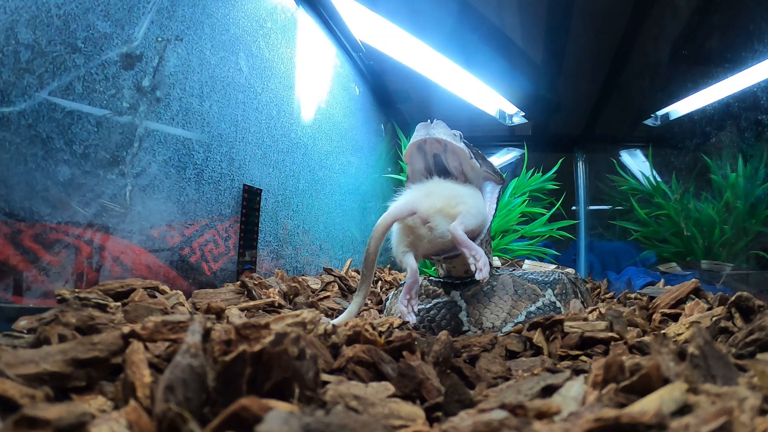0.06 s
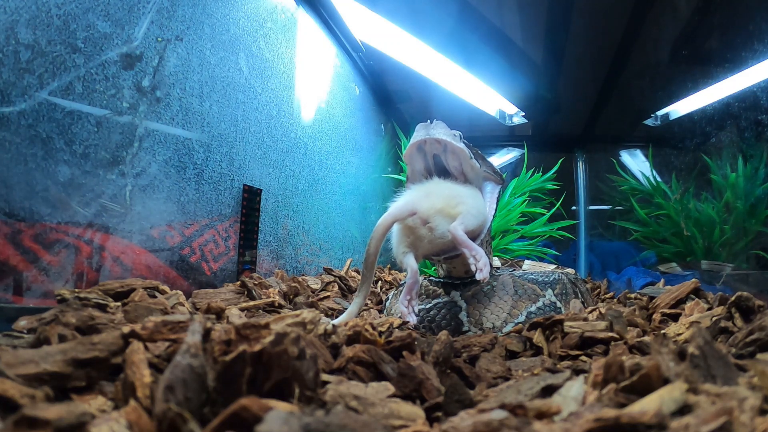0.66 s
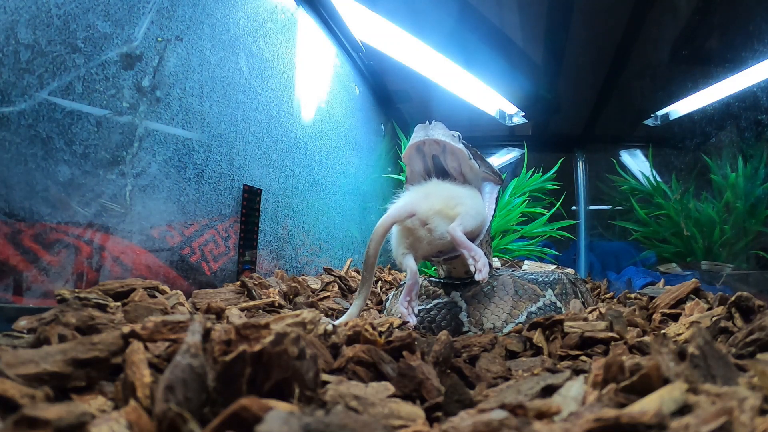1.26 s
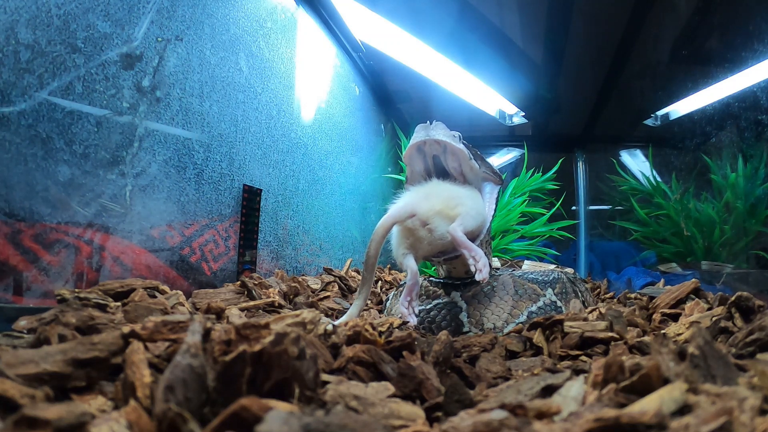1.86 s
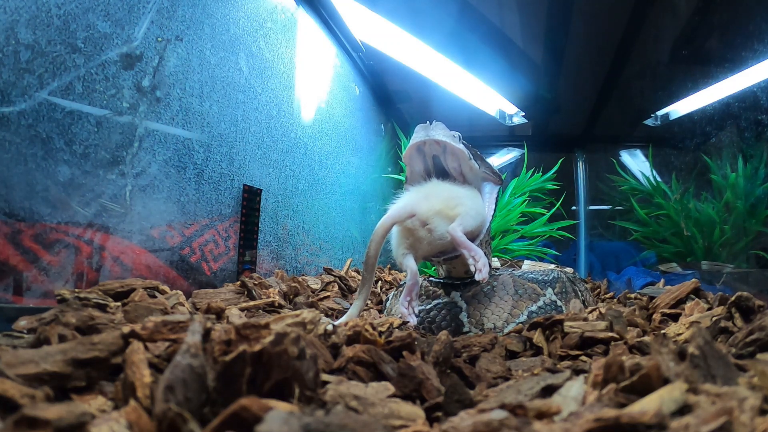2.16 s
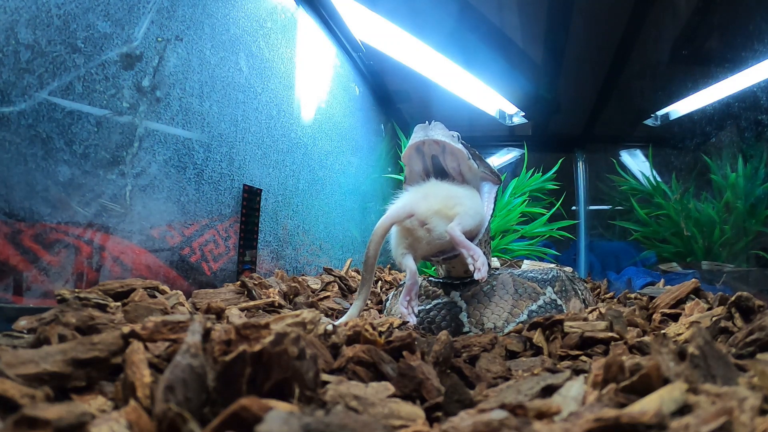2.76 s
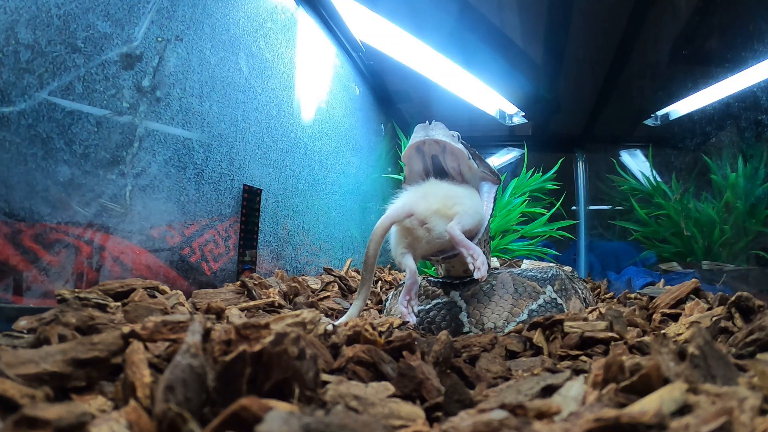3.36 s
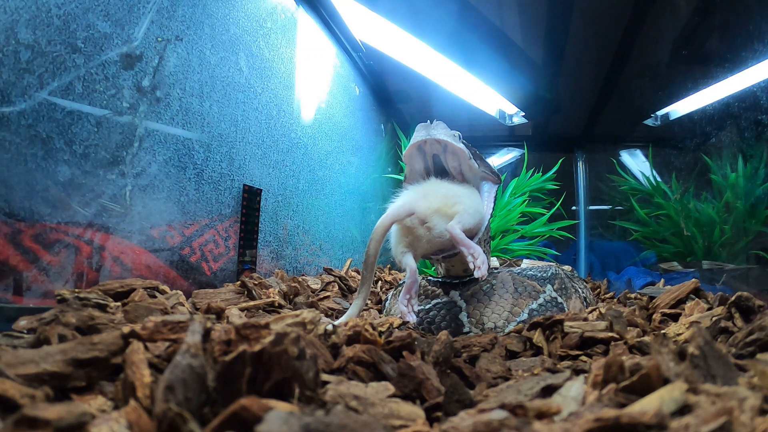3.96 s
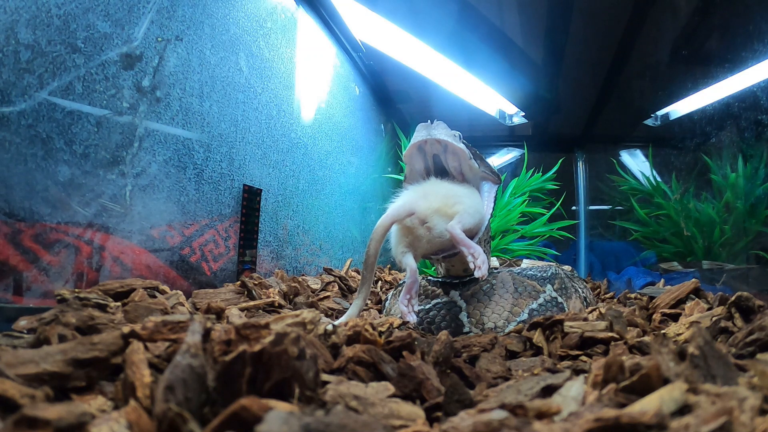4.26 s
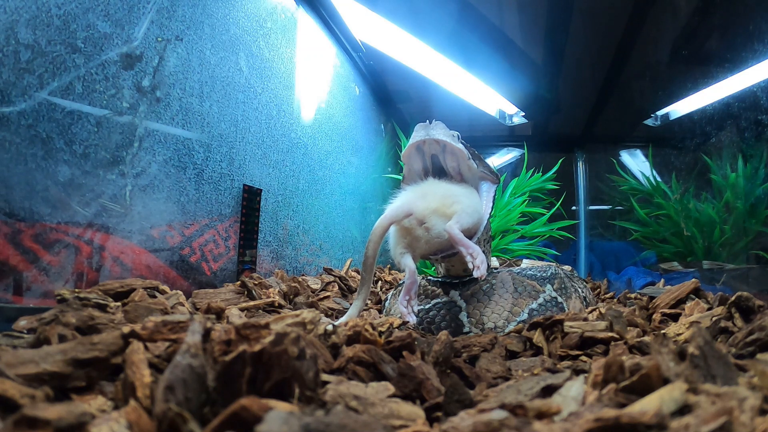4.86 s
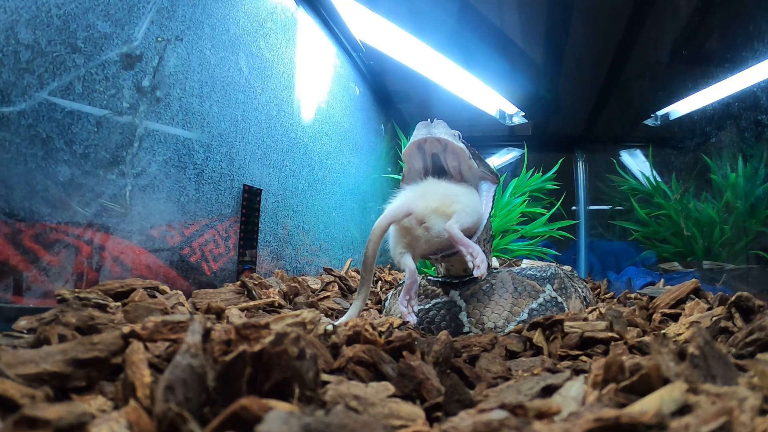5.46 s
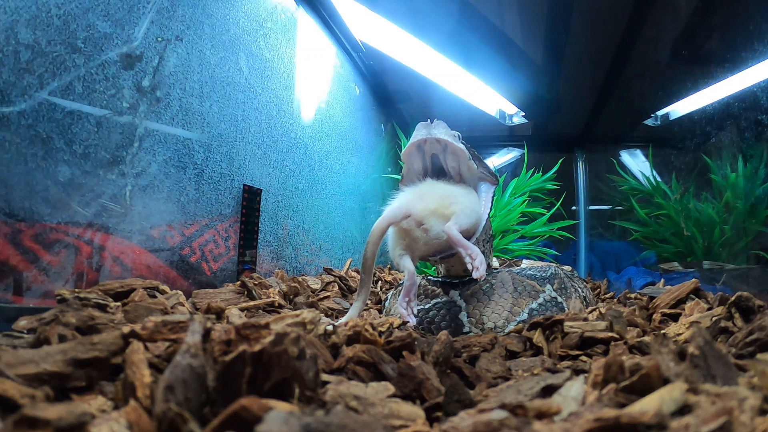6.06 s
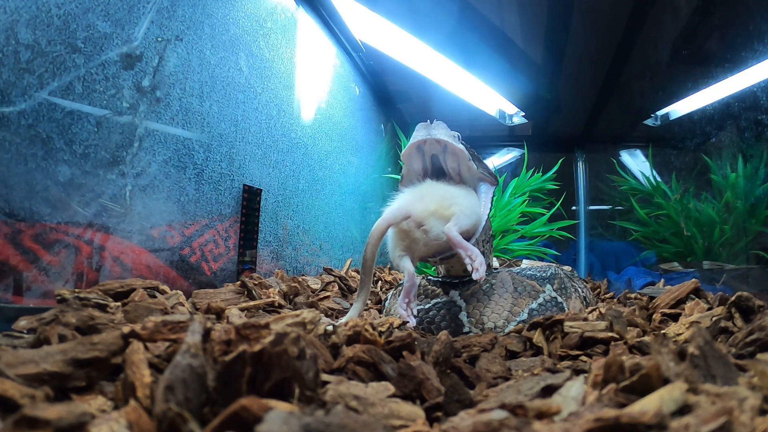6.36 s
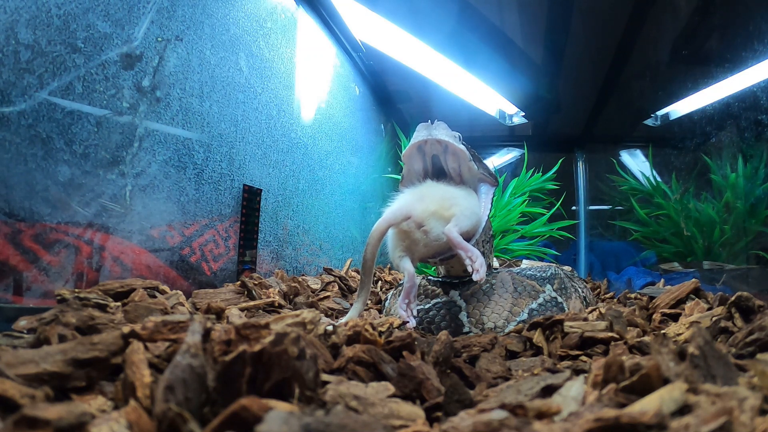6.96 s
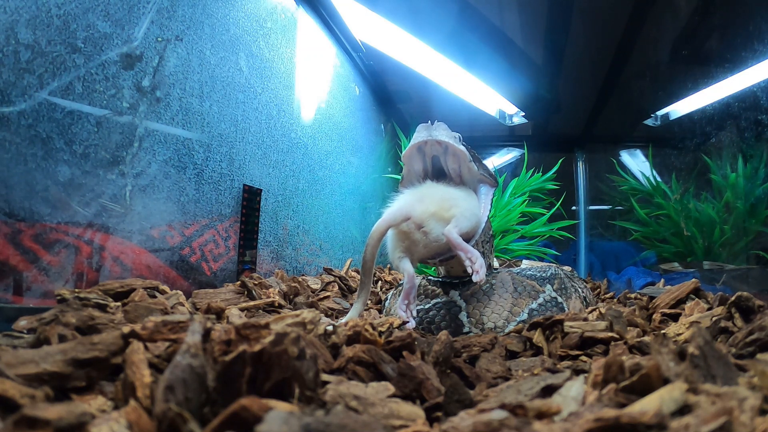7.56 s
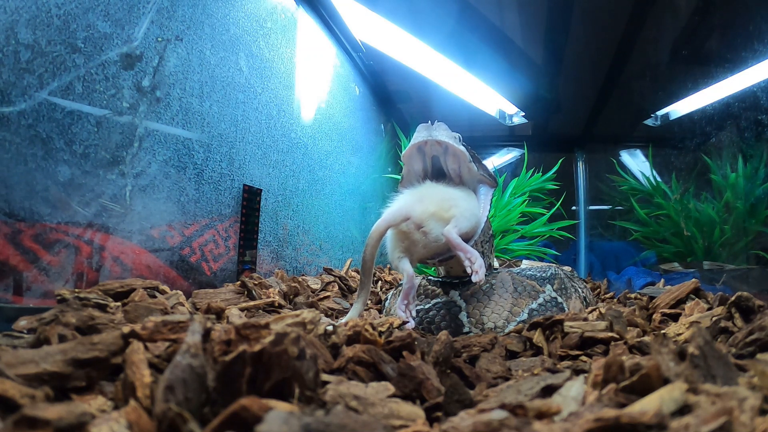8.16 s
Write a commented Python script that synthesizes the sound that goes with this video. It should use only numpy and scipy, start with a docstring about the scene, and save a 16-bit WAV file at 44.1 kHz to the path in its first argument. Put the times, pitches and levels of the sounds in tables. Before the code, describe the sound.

A steady low electrical hum and fan hiss in a terrarium, with one light knock and a few soft scuffs on bark.

```python
"""Inside a glass terrarium in a quiet room: a mains motor hums and its fan hisses steadily.
The tank booms at the hum's strongest line and rings in the hiss with many narrow resonances.
A light knock rings a hollow body once. Soft scuffs and low bumps on the bark bedding are
probably a snake shifting with its prey."""
import sys
import numpy as np
from scipy import signal
from scipy.fft import rfft, irfft
from scipy.io import wavfile
from scipy.ndimage import uniform_filter1d

SR = 44100
rng = np.random.default_rng(int(sys.argv[2]) if len(sys.argv) > 2 else 0)


def wav_record(signal):
    """Record a signal, one row per channel, as 16-bit PCM in the file named by sys.argv[1]."""
    frames = np.transpose(np.atleast_2d(signal))
    bounded = np.clip(frames, -1, 1)
    # unit amplitude maps onto the largest positive 16-bit level
    quanta = np.round(bounded * 32767).astype(np.int16)
    wavfile.write(sys.argv[1], SR, quanta)


N = 362502

# Motor lines. Each row: multiple of the shaft rate, level in dB.
MOTOR_LINES = [(4, -67), (5, -67), (6, -38.5), (9, -64.5), (10, -62.5), (14, -77.5), (16, -75.5)]
# Uneven waver of the hum. Each row: time in seconds, level in dB before centring and scaling.
HUM_WAVER = [(0.1, -39.5), (1.5, -39), (1.59, -44.5), (1.68, -37.5), (1.88, -43.5), (1.93, -39.5),
             (5.5, -39.5), (5.6, -41), (5.82, -37), (5.91, -41.5), (6.52, -40.5), (6.76, -35.5),
             (6.83, -39.5), (7.19, -38.5), (7.29, -40.5), (7.56, -37.5), (7.79, -41), (8.1, -37.5)]
# Fan noise spectra. Each row: frequency in Hz, relative density in dB.
RUMBLE_SPECTRUM = [(10, -35.5), (24, -15.5), (50, -13), (95, -18), (140, -14), (163, -2), (182, 3),
                   (205, -4), (225, -12.5), (285, -14), (322, -7.5), (350, -18.5), (385, -21.5), (455, -24),
                   (505, -22.5), (545, -30.5), (700, -32)]
HISS_SPECTRUM = [(850, -30.5), (1200, -29.0), (1550, -26.0), (1800, -16.5), (2050, -15.5), (2300, -4.5),
                 (2520, -9.0), (2700, -4.5), (3150, -8.0), (3450, -18.0), (3750, -21.0), (4400, -19.5)]
FIZZ_SPECTRUM = [(4400, -1), (5600, -6), (6500, -5.5), (7050, -0.5), (7500, -7.5), (8200, -7.5), (8750, -6),
                 (9500, -13), (10800, -20.5), (12100, -22), (13500, -24.5), (15000, -53)]
WHOOSH_SPECTRUM = [(600, -35), (880, -21), (950, -11), (1000, -8), (1130, -5), (1330, -6), (1420, -11),
                   (1800, -12.5), (2500, -57)]
# Slow drift of the whoosh. Each row: time in seconds, gain in dB.
WHOOSH_DRIFT = [(0.27, -5), (0.44, -1), (0.54, -2), (0.69, 2.5), (1.01, -4), (1.3, 2), (1.62, -7),
                (1.93, 0), (2.23, 0.5), (2.87, -3), (3.07, 1.5), (3.17, -4), (3.39, 3.5), (3.72, -5),
                (3.87, 4), (4.27, -1.5), (4.53, 1.5), (4.64, -5), (4.85, 0.5), (4.96, -4), (5.3, 0.5),
                (5.51, -3.5), (5.73, -2.5), (6.3, -2), (6.75, 2.5), (6.94, -4), (7.03, 0), (7.14, -0.5)]
# Tank resonances. Each row: frequency in Hz, width in Hz, lift in dB.
TANK_RESONANCES = [(980, 48, 6.0), (1030, 22, 9.0), (1111, 48, 5.5), (1196, 48, 2.5), (1359, 42, 5.0),
                   (1643, 48, 4.5), (1891, 11, 8.0), (1921, 23, 7.0), (1991, 32, 12.0), (2073, 48, 11.0),
                   (2176, 18, 7.5), (2239, 21, 8.0), (2282, 40, 6.0), (2321, 20, 9.0), (2410, 38, 10.5),
                   (2459, 33, 7.0), (2553, 7, 8.0), (2636, 48, 6.5), (2696, 8, 5.5), (2771, 8, 5.5),
                   (2843, 48, 5.5), (2897, 17, 4.0), (3069, 37, 9.5), (3126, 14, 7.5), (3264, 48, 6.5),
                   (3325, 26, 4.5), (3422, 48, 5.5), (3469, 29, 13.5), (3519, 36, 12.0), (3602, 29, 9.5),
                   (3699, 11, 4.5), (3786, 48, 5.0)]
# Left-right likeness of the air. Each row: frequency in Hz, coherence from 0 to 1.
STEREO_COHERENCE = [(50, 0.6), (180, 0.99), (350, 1), (750, 0.31), (1000, 0.83), (1400, 0.46), (2200, 1),
                    (3100, 0.64), (3900, .25), (6000, 0.062)]
# Balance of the air. Each row: frequency in Hz, left over right in dB.
STEREO_BALANCE = [(60, -1.5), (180, 6.5), (450, -1), (680, -1), (1000, 2), (1500, 2), (2200, 4), (2700, 6),
                  (3550, 5.5), (5700, 0.5), (7000, 6), (7800, 0), (9500, 6.5), (11500, 0)]
# Phase of the air. Each row: frequency in Hz, left lead in radians.
STEREO_LEAD = [(50, -0.055), (340, -0.54), (600, -1.65), (1300, -0.46), (1900, -0.75), (2800, -1.2),
               (3400, -1.13), (4000, -0.98)]
# Light blow. Each row: start in seconds, gain in dB.
KNOCK_EVENTS = [(1.2014, -32)]
# Modes of the knocked body. Each row: frequency in Hz, relative level in dB, T60 in seconds.
BODY_MODES = [(240, 13, .038), (479, -10, .066), (815, -22, .04), (1157, -5.5, .044), (1276, -9.5, .046),
              (1520, -15, .028), (1900, -10, .014)]
# Rubs. Each row: peak time in seconds, level in dB, rise and T60 in seconds, hollowness from 0 to 1.
SCUFF_EVENTS = [(6.0, -69, .04, 0.22, 1), (7.016, -60.5, 0.018, .19, 0.7), (7.491, -50, 0.009, 0.09, 0.1),
                (7.511, -42, 0.014, 0.23, 0.1)]
# Rub spectrum. Each row: frequency in Hz, relative density in dB.
SCUFF_SPECTRUM = [(30, -18), (130, -3), (200, 4.5), (290, 0), (450, -3), (800, -10.5), (1400, -9.5),
                  (2200, -13), (3500, -28), (7000, -43), (14000, -78)]
# Shoves. Each row: peak time in seconds, peak level in dB, pitch in Hz.
BUMP_EVENTS = [(0.955, -52, 58), (1.48, -55, 45), (2.9, -51, 40), (3.47, -54, 42), (4.32, -54, 45),
               (6.113, -48.5, 50), (6.26, -53, 29), (7.52, -46, 55)]


def motor_hum(shaft_hz=29.984, waver_depth=0.76):
    """Mains-locked shaft harmonics; the strongest line's loudness wavers unevenly, as when air rumble beats
    against it."""
    t = np.arange(N) / SR
    waver_db = uniform_filter1d(np.interp(t, *np.transpose(HUM_WAVER)), size=2400)
    waver_db = waver_depth * (waver_db - waver_db.mean())
    top_db = max(db for _, db in MOTOR_LINES)
    out = np.zeros(N)
    for multiple, db in MOTOR_LINES:
        line = np.sqrt(2) * np.sin(2 * np.pi * (multiple * shaft_hz * t + rng.random()))
        out += gain(db + waver_db * (db == top_db)) * line
    return pan(out, left_db=1.58)


def fan_air(rumble_db=-69, hiss_db=-73.5, fizz_db=-94.5, whoosh_db=-89,
            lump_db=3.0, lump_below_hz=80, flutter_db=3):
    """Moving air, coloured by the tank: lumpy rumble, even hiss and fizz, fluttering whoosh."""
    hz = np.fft.rfftfreq(N, 1 / SR)
    bands = [(RUMBLE_SPECTRUM, rumble_db), (HISS_SPECTRUM, hiss_db), (FIZZ_SPECTRUM, fizz_db)]
    spectrum = [(f, db + band_db) for points, band_db in bands for f, db in points]
    lift_db = tank_lift_db(hz)
    steady = stereo_noise(log_interp(spectrum, hz) + lift_db, hz)
    deep = irfft(rfft(steady) / (1 + (hz / lump_below_hz) ** 8), N)
    lumps = unit_rms(gain(lump_db * wander(corner_hz=10.0)))
    drift_db = np.interp(np.arange(N) / SR, *np.transpose(WHOOSH_DRIFT))
    flutter = gain(drift_db + flutter_db * np.tanh(wander(corner_hz=24)))
    whoosh = flutter * stereo_noise(log_interp(WHOOSH_SPECTRUM, hz) + whoosh_db + lift_db, hz)
    return steady + deep * (lumps - 1) + whoosh


def tank_lift_db(hz, ripple_db=1.65):
    """Strong narrow resonances; crowded weak ones ripple the spectrum between and above them."""
    peaks_db = sum(db / (1 + (2 * (hz - f) / width_hz) ** 2) for f, width_hz, db in TANK_RESONANCES)
    ripple = unit_rms(uniform_filter1d(rng.standard_normal(len(hz)), size=130))
    return peaks_db + ripple_db * ripple * (hz > TANK_RESONANCES[0][0])


def knock(attack_cycles=1.5):
    """A light blow rings damped modes of a hollow body; highs first, thud just after."""
    t = np.arange(SR // 4) / SR
    ring, out = np.zeros(len(t)), np.zeros(N)
    for k, (hz, db, t60_s) in enumerate(BODY_MODES):
        polarity = (-1) ** k  # neighbouring modes swing opposite ways
        rise = 1 - np.exp(-(t * hz / attack_cycles) ** 2)
        ring += polarity * rise * gain(db - 60 * t / t60_s) * np.sin(2 * np.pi * hz * t)
    for start_s, db in KNOCK_EVENTS:
        span = out[round(start_s * SR):][:len(ring)]
        span += gain(db) * ring[:len(span)]
    return pan(out, left_db=2.3)


def scuffs(side_gain=0.19, hollow_hz=760, hollow_width_hz=380):
    """Dull rubs on bark bedding: noise swells and dies away; the lightest sound hollow."""
    t, hz = np.arange(N) / SR, np.fft.rfftfreq(N, 1 / SR)
    out = np.zeros((2, N))
    resonance = 1 / (1 + (2 * (hz - hollow_hz) / hollow_width_hz) ** 2)
    for peak_s, db, rise_s, t60_s, hollow in SCUFF_EVENTS:
        colour = gain(log_interp(SCUFF_SPECTRUM, hz)) * (1 - hollow + hollow * resonance)
        mid, side = (irfft(white_spectrum(hz) * colour, N) for _ in range(2))
        rub = unit_rms(np.array([mid + side_gain * side, mid - side_gain * side]))
        swell = np.exp(-(np.minimum(t - peak_s, 0) / rise_s) ** 2)
        fade = gain(-60 * np.maximum(t - peak_s, 0) / t60_s)
        out += gain(db) * swell * fade * rub
    return pan(out, left_db=3.0)


def bumps(half_width_cycles=0.76):
    """Soft shoves on the bedding: each a deep pulse of about one swing."""
    t, out = np.arange(N) / SR, np.zeros(N)
    for peak_s, db, hz in BUMP_EVENTS:
        cycles = (t - peak_s) * hz
        out += gain(db) * np.exp(-(cycles / half_width_cycles) ** 2) * np.cos(2 * np.pi * cycles)
    return out


def stereo_noise(density_db, hz):
    """Noise at two nearby points; long waves reach both much alike."""
    coherence = np.clip(log_interp(STEREO_COHERENCE, hz), 0, 1)
    left = white_spectrum(hz)
    right = coherence * left + np.sqrt(1 - coherence ** 2) * white_spectrum(hz)
    right *= np.exp(-1j * log_interp(STEREO_LEAD, hz))
    balance = gain(log_interp(STEREO_BALANCE, hz))
    pair = np.array([left * balance, right]) * np.sqrt(2 / (1 + balance ** 2))
    return irfft(pair * gain(density_db), N)


def wander(corner_hz):
    """Low-passed random drift, rms 1."""
    hz = np.fft.rfftfreq(N, 1 / SR)
    return unit_rms(irfft(white_spectrum(hz) / (1 + (hz / corner_hz) ** 2) ** 2, N))


def white_spectrum(hz):
    """Random spectrum, unit power per Hz."""
    return (rng.standard_normal(len(hz)) + 1j * rng.standard_normal(len(hz))) * np.sqrt(N * SR) / 2


def log_interp(points, hz):
    """Linear interpolation over log frequency."""
    points_hz, values = np.transpose(points)
    return np.interp(np.log(hz + 1), np.log(points_hz + 1), values)


def pan(x, left_db):
    """Mono to stereo, left over right by left_db."""
    return x * gain([[left_db / 2], [-left_db / 2]])


def gain(db):
    """dB to amplitude factor."""
    return 10 ** (np.asarray(db) / 20)


def unit_rms(x):
    """Scales to rms 1."""
    return x / np.sqrt(np.mean(x ** 2) + 1e-20)


def scene():
    """Hum and air throughout, small movements on top."""
    return motor_hum() + fan_air() + knock() + scuffs() + bumps()


def record(dry):
    """Low-pass at 15 kHz."""
    lowpass = signal.firwin(511, 15000, window=("kaiser", 9), fs=SR)
    return signal.oaconvolve(dry, lowpass[None], "same")


dry = scene()
out = record(dry)
wav_record(out)
```